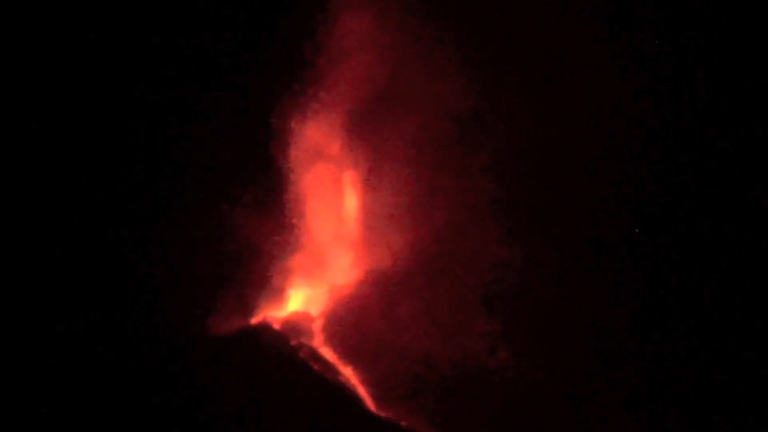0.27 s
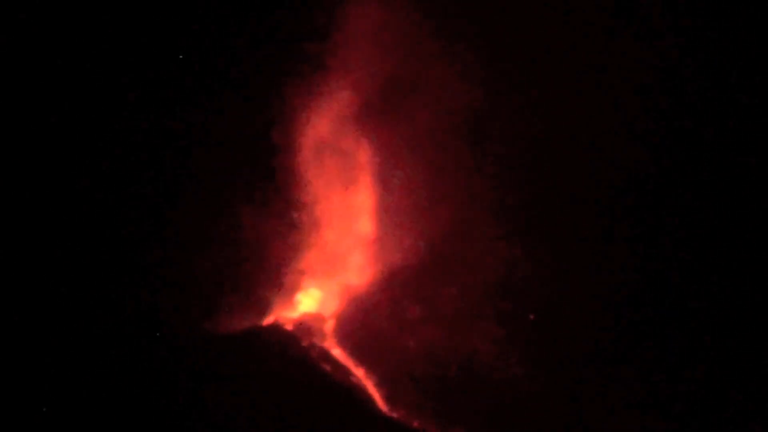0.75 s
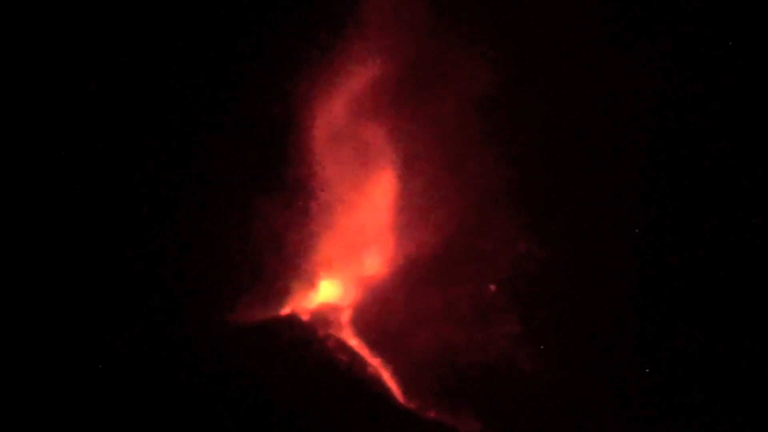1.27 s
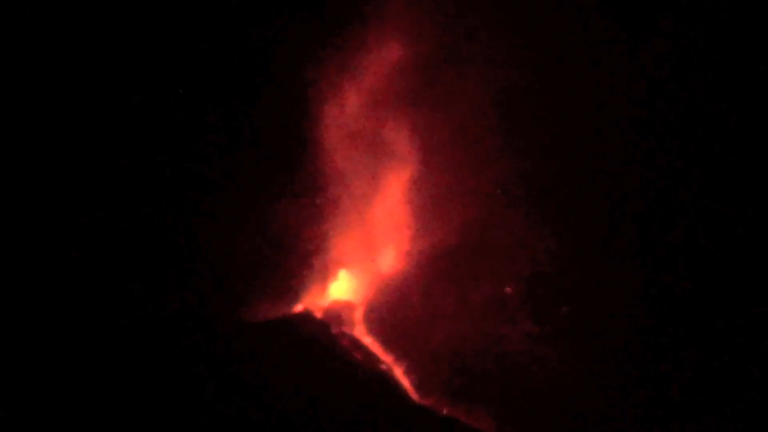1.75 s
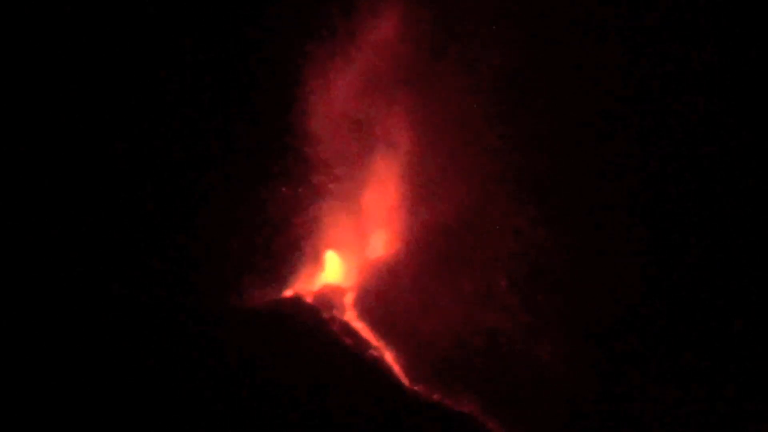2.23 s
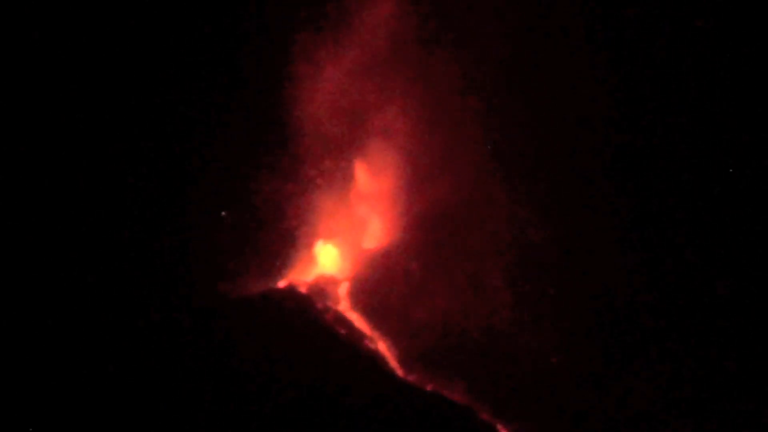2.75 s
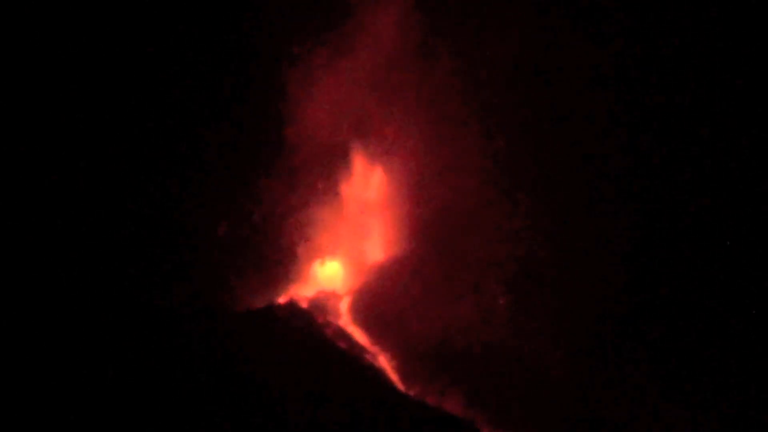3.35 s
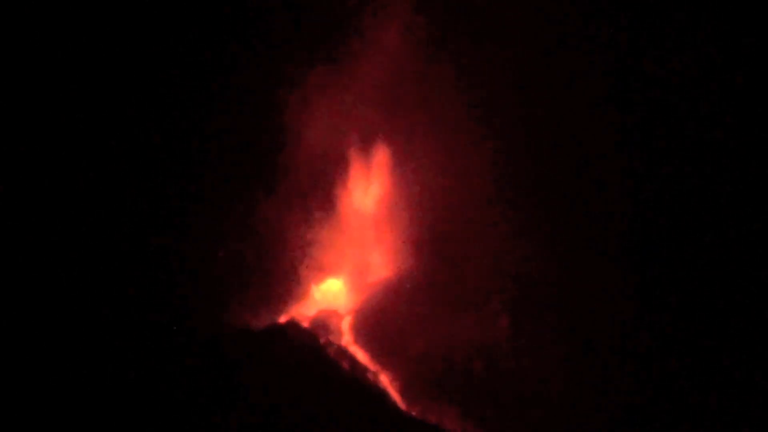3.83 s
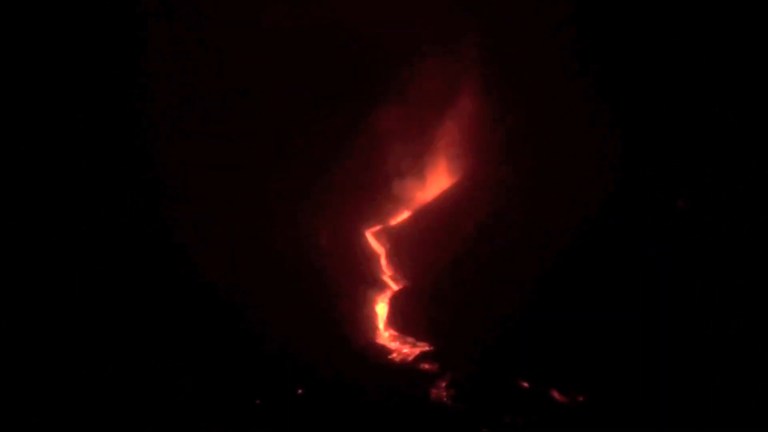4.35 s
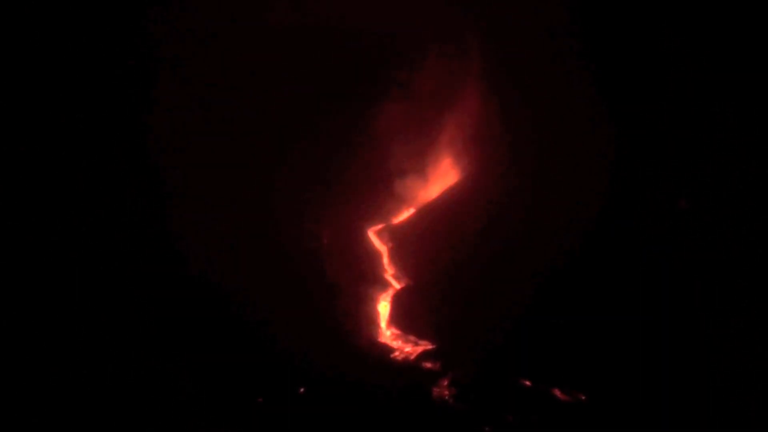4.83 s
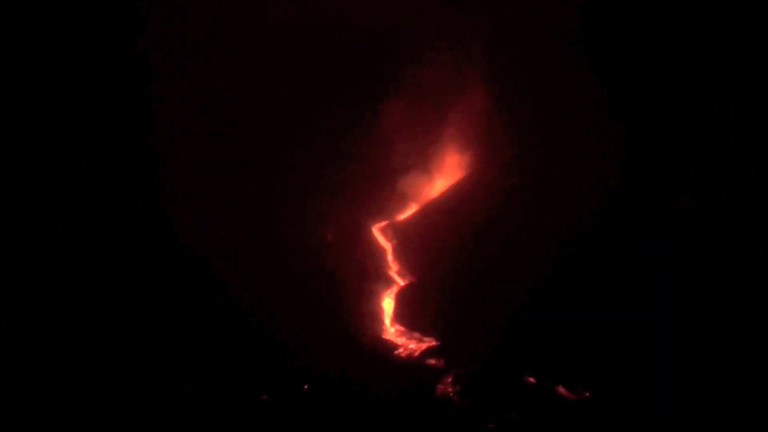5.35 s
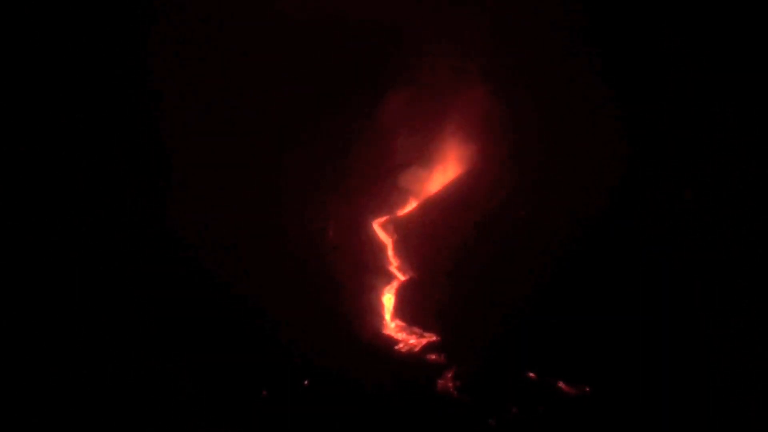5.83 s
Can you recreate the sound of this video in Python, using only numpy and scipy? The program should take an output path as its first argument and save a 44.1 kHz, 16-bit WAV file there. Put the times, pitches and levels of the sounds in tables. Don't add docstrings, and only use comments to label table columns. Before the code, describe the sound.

A far volcano throbs and rumbles very low under a muffled roar, while nearby surf hisses, stones knock and spray patters.

```python
import sys
import numpy as np
from scipy import signal
from scipy.fft import rfft, irfft, next_fast_len
from scipy.io import wavfile
from scipy.ndimage import uniform_filter1d

SR = 44100
rng = np.random.default_rng(int(sys.argv[2]) if len(sys.argv) > 2 else 0)


def transcribe(u):
    v = np.clip(np.atleast_2d(u).T, -1, 1)
    q = np.round(v * 32767).astype(np.int16)
    wavfile.write(sys.argv[1], SR, q)


def voltage_ratio(decibels):
    exponent = np.asarray(decibels, float) / 20
    return 10 ** exponent


N = 268343
LONG = next_fast_len(N + 8192)
HZ = np.maximum(np.fft.rfftfreq(LONG, 1 / SR), 1)
TIME, LOG_HZ = np.arange(LONG) / SR, np.log(HZ)

# freq_hz [Hz], left_minus_right_db [dB], left_lag_rad [radians], rumble_likeness [0-1]
MIC_PAIR = [(15.2, -15.5, -5, 0), (30.2, 1.5, 0.5, 0.95), (47.4, -2, 0.47, 0.86), (60.6, 10, 0, 0.2),
            (69, 1, -1.38, 0.6), (125, -3.5, -1.15, 0.9), (202, -7.5, 0, 0.3), (450, -8.5, 1.8, 0.3),
            (840, -8, 2, 0.4), (1370, -2.5, 2, 0.3), (1930, 0.5, 2.5, 0.3), (3450, 1, 2.5, 0.5),
            (6100, 0.5, 4, .2)]

# freq_hz [Hz], density_db [dB per Hz]
VENT_COLOUR = [(10, -17.5), (20, -7.5), (30, -3), (40, 3), (50, -1.5), (62, -11), (78, -6.5), (100, -13.5),
               (130, -23.5), (180, -30.5), (260, -37), (400, -48), (800, -60), (4000, -130)]
# peak_s [s], level_db [dB], half_length_s [s], pitch_hz [Hz]
SLUGS = [(0.01, -11.5, 0.045, 40), (0.07, -21.5, 0.02, 36.99), (0.168, -16.5, 0.017, 37.26),
         (0.266, -22.5, 0.027, 40.93), (0.354, -23, 0.021, 42.06), (0.426, -24.5, 0.027, 34.43),
         (0.541, -17, 0.031, 42.09), (0.646, -25.5, 0.015, 49.4), (0.716, -26, 0.013, 34.88),
         (0.814, -19, 0.019, 38.45), (0.987, -18, 0.063, 41.51), (1.131, -20, 0.012, 41.58),
         (1.237, -20.5, 0.043, 37.66), (1.46, -18.5, 0.066, 38.32), (1.615, -18.5, 0.025, 38.53),
         (1.763, -21, 0.017, 39.18), (1.877, -21.5, 0.039, 37.76), (1.94, -16, 0.016, 37.52),
         (2.035, -28, 0.043, 36.7), (2.155, -18, 0.032, 38.6), (2.338, -18.5, 0.024, 41.22),
         (2.463, -19.5, 0.05, 35.82), (2.586, -18, 0.018, 42.38), (2.65, -14.5, 0.022, 40),
         (2.734, -15, 0.032, 37.63), (2.831, -17, 0.021, 39.1), (2.914, -15.5, 0.025, 43.05),
         (3.048, -18, 0.05, 41.26), (3.328, -20.5, 0.092, 39.8), (3.422, -18.5, 0.016, 43.55),
         (3.522, -23, 0.039, 40.58), (3.623, -18.5, 0.017, 35.53), (3.769, -19, 0.04, 41.08),
         (3.876, -18.5, 0.012, 40.8), (3.941, -20, 0.031, 35.78), (4.074, -26, 0.012, 44.3),
         (4.202, -25.5, 0.01, 36.35), (4.283, -22.5, 0.019, 44.3), (4.355, -22.5, 0.035, 43.06),
         (4.499, -26.5, 0.032, 37.84), (4.662, -19, 0.038, 33.97), (4.779, -20, 0.016, 33.7),
         (5.103, -23.5, 0.068, 39.64), (5.174, -20.5, 0.012, 40.1), (5.235, -21, 0.011, 41.1),
         (5.361, -21, 0.016, 37.9), (5.447, -21, 0.014, 42.4), (5.564, -19, 0.045, 33.6),
         (5.706, -22, 0.039, 31.14), (5.874, -22.5, 0.028, 41.04), (6.033, -28, 0.087, 40.93)]
# peak_s [s], level_db [dB], half_length_s [s]
SURGES = [(0.036, -27.5, 0.062), (0.18, -26.6, 0.057), (0.299, -31, 0.063), (0.412, -27, 0.024),
          (0.561, -28.5, 0.054), (0.681, -26.5, 0.019), (0.793, -29.5, 0.075), (0.892, -28, 0.024),
          (0.986, -36, 0.014), (1.058, -34.5, 0.129), (1.296, -33, 0.042), (1.438, -30.5, 0.037),
          (1.513, -44, 0.019), (1.595, -30, 0.033), (1.695, -31, 0.083), (1.889, -24.7, 0.036),
          (1.996, -30, 0.026), (2.114, -26.5, 0.064), (2.268, -27, 0.015), (2.322, -31.1, 0.15),
          (2.535, -29.5, 0.024), (2.624, -23, 0.044), (2.829, -28, 0.075), (2.944, -33, 0.016),
          (3.035, -24, 0.027), (3.097, -29, 0.028), (3.19, -30.5, 0.052), (3.359, -30, 0.058),
          (3.475, -29, 0.035), (3.611, -27.5, 0.06), (3.771, -29.1, 0.098), (3.928, -37, 0.015),
          (3.989, -36, 0.017), (4.061, -46, 0.012), (4.157, -35, 0.018), (4.307, -30, 0.052),
          (4.445, -30.5, 0.063), (4.622, -31, 0.051), (4.717, -33, 0.014), (4.767, -36, 0.021),
          (4.866, -36, 0.016), (4.915, -28.5, 0.022), (5.06, -31.7, 0.03), (5.148, -31, 0.023),
          (5.215, -34, 0.021), (5.269, -38, 0.018), (5.335, -25.5, 0.014), (5.486, -29.5, 0.065),
          (5.708, -31, 0.036), (5.834, -29, 0.024), (5.944, -31, 0.026), (6.069, -25, 0.017)]
# peak_s [s], level_db [dB], half_length_s [s]
TUMBLES = [(0.07, -35, 0.013), (0.188, -37.5, 0.061), (0.361, -38, 0.049), (0.523, -39, 0.062),
           (0.678, -35.8, 0.059), (0.797, -36, 0.023), (0.922, -38, 0.049), (1.089, -39.0, 0.031),
           (1.227, -36.7, 0.018), (1.317, -36, 0.037), (1.436, -39.7, 0.014), (1.523, -35, 0.039),
           (1.654, -33.5, 0.022), (1.76, -40.5, 0.019), (1.88, -38.5, 0.061), (2.123, -38.5, 0.18),
           (2.21, -40, 0.011), (2.438, -39, 0.072), (2.568, -31, 0.019), (2.628, -34, 0.02),
           (2.774, -33.5, 0.094), (2.9, -32.5, 0.023), (2.965, -35, 0.016), (3.042, -48, 0.052),
           (3.246, -33.5, 0.05), (3.394, -34, 0.046), (3.542, -37, 0.048), (3.693, -30.5, 0.024),
           (3.783, -36, 0.028), (3.883, -38.5, 0.033), (3.975, -36, 0.02), (4.029, -42, 0.014),
           (4.143, -39.5, 0.032), (4.244, -36, 0.016), (4.333, -35.8, 0.02), (4.381, -35.6, 0.014),
           (4.438, -39, 0.033), (4.574, -35, 0.052), (4.665, -42, 0.014), (4.749, -37, 0.029),
           (4.872, -40, 0.031), (4.998, -43.7, 0.054), (5.089, -35, 0.011), (5.154, -52, 0.012),
           (5.32, -40.4, 0.062), (5.418, -41, 0.016), (5.506, -41, 0.033), (5.645, -33, 0.051),
           (5.76, -37, 0.012), (5.825, -39.5, 0.035), (5.965, -35.5, 0.11)]
# peak_s [s], level_db [dB], half_length_s [s]
SWELLS = [(0.0, -46.5, 0.044), (0.15, -47, 0.084), (0.6, -50.5, 0.11), (1.05, -51, .1), (2.2, -50, 0.089),
          (2.7, -47, 0.13), (3.15, -49, .03), (3.25, -45, 0.025), (3.85, -53, .06), (4.1, -54, .1),
          (5.25, -46, .06), (5.6, -48, 0.16), (5.98, -51, .08)]
# time_s [s], level_db [dB], brightness_db [dB per octave], direct_share [0-1]
JET = [(0.0, -39.5, -0.5, 0.18), (0.65, -39.5, 1, 0.14), (0.85, -41.5, 1, 0.06), (1.3, -41, 0.5, 0.32),
       (1.8, -43.5, -1, 0.07), (2.3, -43.5, 2.5, 0.15), (3.0, -46, 0.5, 0.07), (3.45, -46.5, -2, 0.34),
       (3.7, -46.5, -1, 0.32), (3.88, -41, -0.5, 0.7), (3.97, -39, 0, 0.9), (4.1, -42, -1, 0.53),
       (4.2, -41.5, -0.5, 0.56), (4.6, -37.5, -3.5, 0.41), (5.0, -41.5, 4.5, 0.38), (5.4, -42.5, 4.5, 0.13),
       (5.62, -38.5, 3.5, 0.23), (6.08, -40.5, 0, 0.25)]
# freq_hz [Hz], density_db [dB per Hz]
JET_COLOUR = [(120, 9), (250, -1), (500, -2.5), (800, -0.5), (1200, -0.2), (1700, -2), (2400, -10.5),
              (3400, -23.5), (5000, -33), (7000, -54), (10000, -62.5), (16000, -75)]

# time_s [s], level_db [dB], left_minus_right_db [dB], near_spray_db [dB], direct_share [0-1]
WASH = [(0.1, -49, 1, 1, 0.68), (0.55, -52, 1, -0.5, .6), (1.15, -57, -0.5, -0.5, .55),
        (1.27, -52.5, -3, -1.5, 1), (1.48, -50.5, 0, 3.5, 0.5), (1.8, -54.5, 0.5, 6.5, 0.53),
        (2.02, -49.5, 0, 7.5, .9), (2.44, -45.5, 3.5, 2, 1), (2.66, -44.5, 1.5, -1, .35),
        (2.93, -48.5, -1, -1.5, .45), (3.07, -44.5, -4, -3.5, 0.57), (3.35, -46.5, 3, -2.5, 0.74),
        (3.75, -53, -2, 0.5, .4), (4.2, -56.5, -2.5, -3.5, .7), (4.47, -53.5, 4, -16, 0.9),
        (4.56, -53.5, 2, -9.5, .8), (4.76, -53.5, 0, -12, .8), (4.9, -44.5, 1, -15, 0.8),
        (5.3, -46.5, 1.5, -3.5, 0.45), (5.58, -49, -7.5, -9, 0.3), (5.76, -45, -4, -5, 0.6),
        (6.08, -48, 2.5, -2.5, .4)]
# freq_hz [Hz], density_db [dB per Hz]
WASH_COLOUR = [(700, -10), (1200, -2.5), (1700, 3), (2400, 3.5), (3400, -3), (5000, -13.5), (7000, -25),
               (10000, -40), (15000, -56)]
# start_s [s], peak_db [dB]
STONES = [(0.218, -36.3), (1.219, -37.2), (1.996, -32.2), (2.01, -35.0), (2.022, -33.2), (2.041, -33.5),
          (2.123, -32.5), (2.143, -34.9), (2.166, -33.2), (2.205, -34), (2.257, -33.4), (2.265, -35.6),
          (2.306, -34.5), (2.34, -33.2), (2.439, -33.1), (2.525, -34.5), (2.543, -34.0), (2.674, -33.9),
          (3.083, -35.9), (3.124, -35.4), (3.289, -36.6), (3.323, -37.3), (4.689, -37.3), (4.734, -38.2),
          (5.367, -35.5), (5.478, -34.8), (5.521, -35.5), (5.6, -34.7), (5.676, -34.9)]
# freq_hz [Hz], density_db [dB per Hz]
STONE_COLOUR = [(600, -16), (1300, -3), (2200, 0), (3500, -5), (5500, -20), (8000, -37), (12000, -62)]
# start_s [s], peak_db [dB], left_minus_right_db [dB]
SPATTER = [(0.5243, -56, 5), (1.4097, -53, 1.5), (1.534, -53, -2), (1.5833, -46, 4), (2.1855, -57, -5),
           (2.166, -50, 0), (2.2074, -43, 0), (2.219, -46, 3), (2.231, -44, 6), (2.2532, -45, 7),
           (2.2977, -50, -3), (2.3343, -40, 5), (2.377, -46, -2), (2.4214, -43, 4), (2.4678, -45, 1),
           (2.505, -52, -1), (2.5561, -47, 9), (2.603, -45, 6), (2.6315, -53, 2), (2.672, -49, -1),
           (2.695, -47, 13), (2.7257, -51, 4), (2.8155, -52, -2), (2.8579, -52, 5), (2.8989, -54, 0.0),
           (2.9862, -49, 3), (3.04, -49, -2), (3.1323, -50, -2), (3.1722, -48, -2), (3.2466, -44, 10),
           (3.293, -49, -3), (3.3344, -54, 6), (3.4017, -53, 5), (3.4257, -55, 2.0), (3.4637, -55, 8),
           (3.4995, -51, 2), (3.5289, -51, 10), (3.6721, -47, -6), (3.731, -50.5, 0), (4.8789, -55, 0),
           (4.9103, -50, 8), (4.9906, -52, 0.0), (5.0704, -47.5, -1), (5.1168, -47.5, -1),
           (5.1607, -50, -2), (5.2051, -49, 0), (5.252, -47, 3), (5.2929, -48.5, 9), (5.3418, -51, -1),
           (5.3662, -49, -1), (5.5409, -51, -2), (5.5658, -49, 0), (5.6795, -47, -1.0), (5.8037, -51, 0),
           (5.8257, -51, 1), (5.8621, -52, -1), (5.8801, -47, -2.5), (5.9285, -48, 7), (6.0272, -46, 0)]
# peak_s [s], level_db [dB], left_minus_right_db [dB]
SPLASHES = [(1.26, -63, 2), (1.43, -64, 5.5), (1.49, -62.5, 6), (1.56, -64.5, 7), (1.75, -66, 7),
            (2.02, -60.5, 3.5), (2.23, -58, 6.5), (2.32, -58, 1.5), (2.39, -55, 1.5), (2.47, -71, -0.5),
            (2.62, -61, 12), (2.67, -66, -11), (2.99, -62, 4.5), (3.03, -58.5, -1.5), (3.12, -67, -3),
            (3.2, -65, 6), (3.25, -59.5, 10), (3.31, -67, -5.5), (3.5, -69, 7), (3.68, -63.5, -11),
            (4.92, -66, 4), (5.27, -64, 7.5), (5.38, -63.5, 9), (5.73, -57, -1), (5.941, -61.5, 14)]
# freq_hz [Hz], density_db [dB per Hz]
SPLASH_COLOUR = [(1500, -5), (3000, 4), (4500, -3.5), (6000, -9.5), (8000, -20.5), (11000, -35.5),
                 (15000, -54)]
# peak_s [s], level_db [dB], half_length_s [s]
FOAM_SHEETS = [
    (1.5, -64.5, .12),
    (1.74, -64, .06),
    (2.4, -66.5, .25),
]
# freq_hz [Hz], density_db [dB per Hz]
FOAM_COLOUR = [(2500, -19.5), (3500, -2), (4500, 3.5), (5600, -2.5), (6500, -14), (10000, -21.5),
               (15000, -40)]
# peak_s [s], level_db [dB], half_length_s [s]
BACKWASH = [
    (4.55, -69.5, 0.054),
    (4.66, -67, 0.07),
    (4.8, -68, .08),
    (5.0, -69, .08),
    (5.3, -61.5, .1),
    (5.45, -64, .08),
    (5.85, -65, .08),
]
# freq_hz [Hz], density_db [dB per Hz]
BACKWASH_COLOUR = [(2500, -20), (3800, -3.5), (4600, 2), (5700, -2.5), (6300, -18), (8000, -39.5)]
# time_s [s], depth_db [dB]
LULLS = [
    (2.195, -6.2),
    (2.247, -14),
    (3.095, -9),
    (3.16, -5),
    (3.418, -5),
    (4.088, -6),
]


def along(table):
    s, *columns = np.transpose(table)
    return [np.interp(TIME, s, column) for column in columns]


def across(table):
    hz, *columns = np.transpose(table)
    return [np.interp(LOG_HZ, np.log(hz), column) for column in columns]


def sides(left_minus_right_db):
    return np.outer([.5, -.5], left_minus_right_db)


def walk(rate):
    hold = max(int(SR / rate), 1)
    steps = rng.standard_normal(LONG // 100)[:LONG // hold + 1]
    slewed = uniform_filter1d(uniform_filter1d(np.repeat(steps, hold), hold), hold)
    return 1.24 * slewed[:LONG]


def noise():
    return rfft(rng.standard_normal(LONG))


def scatter():
    return np.array([noise(), noise()])


def pair(direct):
    return np.array([direct * np.exp(-1j * across(MIC_PAIR)[1]), direct])


def coloured(colour, lo_hz, hi_hz):
    gain = voltage_ratio(across(colour)[0] + sides(across(MIC_PAIR)[0]))
    return gain / np.sqrt(np.mean(gain ** 2 * (HZ > lo_hz) * (HZ < hi_hz)))


def octaves(lo_hz, count):
    place = np.clip(np.log2(HZ / lo_hz), 0, count - 1)
    return [(k, np.cos(np.pi / 2 * np.clip(place - k, -1, 1)) ** 2) for k in range(count)]


def grains(rate, spread_db, clump_db, clump_rate, tail_s):
    chance = rng.random((2, LONG))
    size_db = -spread_db * np.log(chance[1] + 1e-9) + clump_db * walk(clump_rate)
    size = (chance[0] < rate / SR) * voltage_ratio(size_db)
    power = signal.lfilter([1], [1, -np.exp(-1 / (tail_s * SR))], size ** 2)
    burst = rng.standard_normal(LONG) * np.sqrt(power)
    return burst / np.sqrt(uniform_filter1d(burst ** 2, SR // 4) + 1e-9)


def spread_out(direct, gain, share, lo_hz, extra_db, flicker_db, flicker_rate):
    direct, scattered = pair(rfft(direct)) * gain, scatter() * gain
    share = np.clip(share, 0, .78)
    out = 0
    for k, band in octaves(lo_hz, count=len(extra_db)):
        both = np.sqrt(share) * irfft(direct * band, LONG)
        both = both + np.sqrt(1 - share) * irfft(scattered * band, LONG)
        out = out + both * voltage_ratio(extra_db[k] + flicker_db * walk(flicker_rate))
    return out


def steady(x, span_s):
    span = int(span_s * SR)
    power = (3 * x.mean(axis=0) ** 2 + np.mean(x ** 2, axis=0)) / 4
    smooth = uniform_filter1d(uniform_filter1d(power, span, mode="wrap"), span, mode="wrap")
    return x / np.sqrt(smooth)


def bursts(table, rest_db):
    coarse = TIME[::64]
    swells = sum(voltage_ratio(db) ** 2 * np.exp(-((coarse - s) / half) ** 2) for s, db, half, *_ in table)
    return np.interp(TIME, coarse, np.sqrt(voltage_ratio(rest_db) ** 2 + swells))


def conduit_ring():
    pitch_hz = along(SLUGS)[2]
    ring = np.sqrt(2) * np.sin(2 * np.pi * (rng.random() + np.cumsum(pitch_hz) / SR))
    return irfft(pair(rfft(ring)) * voltage_ratio(sides(across(MIC_PAIR)[0])), LONG)


def vent():
    like = np.clip(across(MIC_PAIR)[2], 0, 1)
    wave = np.sqrt(like) * pair(noise()) + np.sqrt(1 - like) * scatter()
    wave = wave * coloured(VENT_COLOUR, 20, 58)
    under = [1 / (1 + (HZ / edge_hz) ** 12) for edge_hz in (28, 57, 92, 150)]
    parts = np.diff([0 * HZ, *under, 1 + 0 * HZ], axis=0)
    ground, deep, upper, tumble, skirt = (irfft(wave * part, LONG) for part in parts)
    ring_share = 0.3
    deep = np.sqrt(ring_share) * conduit_ring() + np.sqrt(1 - ring_share) * steady(deep, .1)
    deep = steady(deep, .035) * bursts(SLUGS, rest_db=-34) * voltage_ratio(0.35)
    upper = steady(upper, .025) * bursts(SURGES, rest_db=-43) * voltage_ratio(-0.84)
    tumble = steady(tumble, .022) * bursts(TUMBLES, rest_db=-47.5) * voltage_ratio(-0.7)
    ground = steady(ground, .12) * voltage_ratio(-29)
    skirt = steady(skirt, .06) * bursts(SWELLS, rest_db=-51)
    return deep + upper + tumble + ground + skirt


def jet():
    level_db, bright_db, share = along(JET)
    mean_db, body_lag, body_per_share_db = -42.5, 0.62, -6
    body_db = body_lag * (mean_db - level_db) + body_per_share_db * (share - .4)
    eddies = grains(3000, 2.1, clump_db=2.0, clump_rate=39.0, tail_s=0.0056)
    extra_db = [1.3 * body_db, 0.75 * body_db, .15 * bright_db, 0.9 * bright_db, 1.6 * bright_db]
    gain = coloured(JET_COLOUR, 500, 1690)
    roar = spread_out(eddies, gain, share, 290, extra_db, flicker_db=0.54, flicker_rate=4.74)
    return voltage_ratio(level_db) * roar


def wash():
    level_db, pan_db, spray_db, share = along(WASH)
    crackle = grains(900, 3.4, clump_db=1.0, clump_rate=25.0, tail_s=0.0011)
    extra_db = [0, 0, 0.27 * spray_db, 1.3 * spray_db, 1.1 * spray_db + .3]
    gain = coloured(WASH_COLOUR, 2464, 3400)
    fizz = spread_out(crackle, gain, share, 1200, extra_db, flicker_db=1.0, flicker_rate=12)
    return fizz * voltage_ratio(level_db - 3.0 + sides(pan_db))


def stones():
    age = np.arange(SR // 50) / SR
    shape = np.minimum(age / .001, 1) * np.exp(-age / .003)
    out = np.zeros(LONG)
    for s, db in STONES:
        knock = rng.standard_normal(len(age))
        out[int(s * SR):][:len(age)] += voltage_ratio(db - 3) * knock * shape
    return irfft(pair(rfft(out)) * coloured(STONE_COLOUR, 1800, 7000), LONG)


def spatter():
    rise_s, fall_s, trim_db = .0008, .0034, -3.5
    age = np.arange(SR // 12) / SR
    shape = np.minimum(age / rise_s, 1) * np.exp(-age / fall_s)
    drops = irfft(pair(noise()) * coloured(SPLASH_COLOUR, 4000, 10000), LONG)
    out = np.zeros((2, LONG))
    for s, db, pan_db in SPATTER:
        near = slice(int(s * SR), int(s * SR) + len(age))
        out[:, near] += voltage_ratio(db + trim_db + sides(pan_db)) * shape * drops[:, near]
    return out


def splashes():
    rise_s, fall_s = 0.017, 0.048
    front_db = 10
    gain = coloured(SPLASH_COLOUR, 5000, 10000)
    spray = grains(2500, 1.4, clump_db=1, clump_rate=60, tail_s=.001)
    direct = irfft(pair(rfft(spray)) * gain, LONG)
    scattered = irfft(scatter() * gain, LONG)
    out = np.zeros((2, LONG))
    for s, db, pan_db in SPLASHES:
        near = slice(int((s - .25) * SR), int((s + .25) * SR))
        age = TIME[near] - s
        share = max(np.exp(-(pan_db / front_db) ** 2), .25)
        swell = np.exp(-np.where(age < 0, (age / rise_s) ** 2 / 2, age / fall_s))
        mix = np.sqrt(share) * direct[:, near] + np.sqrt(1 - share) * scattered[:, near]
        out[:, near] += voltage_ratio(db - 3.5 + sides(pan_db)) * swell * mix
    return out


def draining(table, colour, rest_db):
    wave = (pair(noise()) + scatter()) / np.sqrt(2)
    return irfft(wave * coloured(colour, 3500, 6000), LONG) * bursts(table, rest_db)


def lulls():
    half_s = 0.0053
    return voltage_ratio(sum(db * np.exp(-((TIME - s) / half_s) ** 2) for s, db in LULLS))


def scene():
    shore = wash() + splashes()
    shore = shore + draining(FOAM_SHEETS, FOAM_COLOUR, rest_db=-83.5)
    shore = shore + draining(BACKWASH, BACKWASH_COLOUR, rest_db=-94)
    volcano = vent() + jet()
    return (volcano + shore * lulls() + stones() + spatter())[:, :N]


def top_cut(x):
    return signal.sosfilt(signal.butter(12, 15700, fs=SR, output="sos"), x)


def record(dry):
    hiss = voltage_ratio(-91) * rng.standard_normal(dry.shape)
    bass_cut = signal.butter(2, 17, "high", fs=SR, output="sos")
    return top_cut(signal.sosfilt(bass_cut, dry + hiss))


dry = scene()
out = record(dry)
transcribe(out)
```